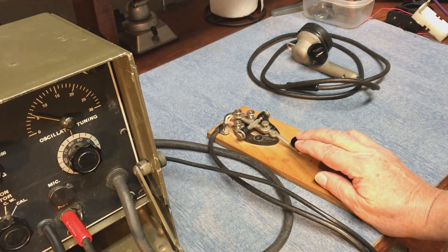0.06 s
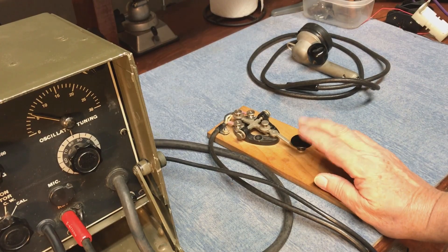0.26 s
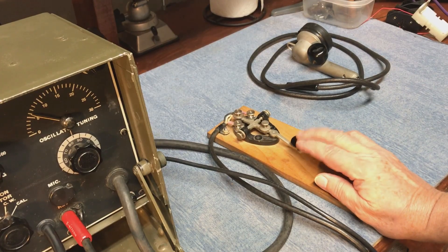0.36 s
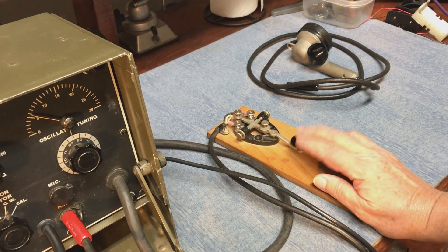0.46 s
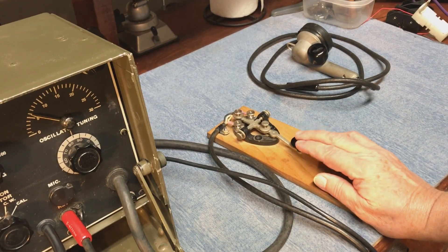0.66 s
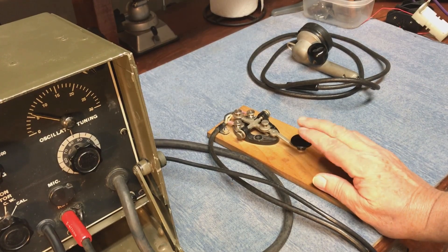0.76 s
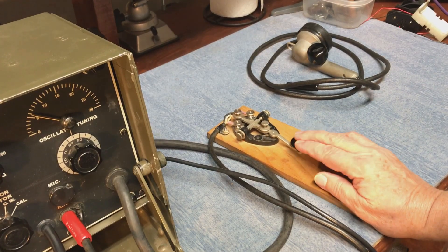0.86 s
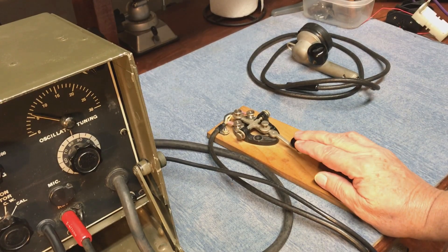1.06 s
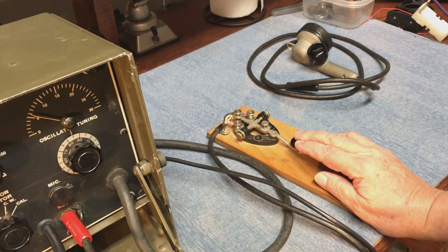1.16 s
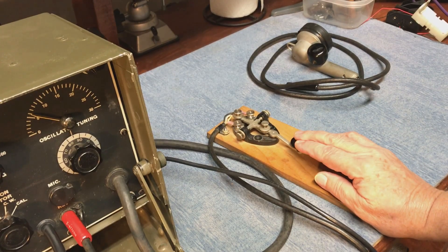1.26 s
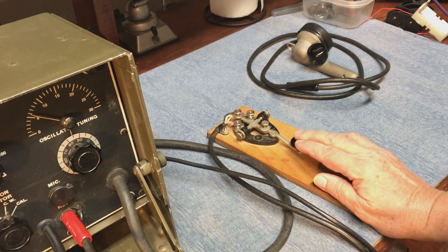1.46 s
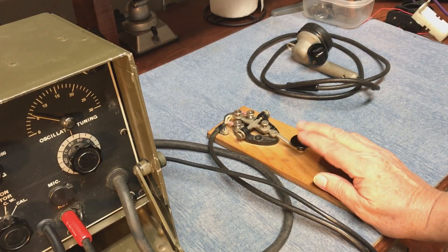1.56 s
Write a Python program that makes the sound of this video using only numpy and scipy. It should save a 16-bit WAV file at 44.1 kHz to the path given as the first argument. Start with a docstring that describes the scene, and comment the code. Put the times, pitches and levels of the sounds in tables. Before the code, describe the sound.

Close by in a small room, a metal telegraph key on a wooden base clatters up and snaps down four times within a second. Its spring pings faintly, then only a soft electrical hum and hiss remain.

```python
"""In a small room, a telegraph key on a wooden base is pressed four times on a cloth-covered table.
Going down, the lever snaps onto its contact; let go, it clatters against the back stop and its spring
pings faintly. Each impact excites the damped modes of the metal, the base and the table top.
Mains equipment hums and whines steadily behind, with a soft hiss and very faint electrical ticks."""
import sys
import numpy as np
from scipy import signal
from scipy.fft import rfft, irfft, next_fast_len
from scipy.io import wavfile
from scipy.ndimage import uniform_filter1d, map_coordinates

SR = 44100
rng = np.random.default_rng(int(sys.argv[2]) if len(sys.argv) > 2 else 0)


def store_wav(level_fs):
    """Save 16-bit WAV to argv[1]."""
    pcm = np.round(np.clip(np.atleast_2d(level_fs), -1, 1) * 32767)
    wavfile.write(sys.argv[1], SR, pcm.T.astype(np.int16))


N = 70560
ATTACK_S = .0001

# Impacts on the contact and the back stop. Each row: start in seconds, level in dB, table thump in dB.
PRESSES = [(.3120, 0.5, -35.5), (0.4697, -6, -42), (0.6152, -2.5, -42), (0.822, 2, -36)]
RETURNS = [(0.1998, 1.5, -45.5), (0.2136, 1, -37), (0.2239, -13, -64.5), (0.3878, -1.5, -41),
           (0.3985, -3.5, -41), (.4065, -11.5, -51), (0.5269, 0, -47.5), (0.5404, -3, -39.5),
           (0.55, -11.5, -45.5), (.6881, 2, -42), (0.7016, -1, -37)]
# Noise spectrum of the spring and the pivot. Each row: frequency in Hz, level in dB.
SPRING_SPECTRUM = [(1500, -30.5), (3350, -7.5), (4300, -8.5), (5480, 2.5), (6400, -9.5), (7500, -17),
                   (11000, -22.5), (13000, -31.5)]


def amp(db):
    """Amplitude grows tenfold every 20 dB."""
    return 10 ** (np.asarray(db) / 20)


def along(points, hz):
    """Interpolation of (Hz, value) points on a logarithmic frequency axis."""
    f, v = np.transpose(points)
    return np.interp(np.log(hz + 1), np.log(f + 1), v)


def filtered(x, response):
    """Linear filtering multiplies the spectrum by a frequency response."""
    m = next_fast_len(len(x) + SR // 2)
    return irfft(rfft(x, m) * response(np.fft.rfftfreq(m, 1 / SR)), m)[:len(x)]


def coloured(x, spectrum):
    """A minimum-phase filter evens a short sound out to a given spectrum, with unit energy."""
    m = next_fast_len(2 * len(x), real=True) * 2
    z = rfft(x, m)
    power = np.abs(uniform_filter1d(np.abs(z) ** 2, size=int(250 * m / SR)))  # averaged over 250 Hz
    gain = amp(along(spectrum, np.fft.rfftfreq(m, 1 / SR))) / np.sqrt(power + 1e-12)
    cepstrum = irfft(np.log(gain), m)
    causal_response = np.exp(rfft(2 * cepstrum[:m // 2], m))
    y = irfft(z * causal_response, m)[:len(x)]
    return y / np.linalg.norm(y)


def noise(spectrum):
    """Filtering colours white noise; the rms is 1."""
    x = filtered(rng.standard_normal(N), lambda hz: amp(along(spectrum, hz)))
    return x / x.std()


def wobble(rate):
    """Slow random modulation: a spline through rate knots a second."""
    knots = rng.standard_normal(int(N * rate / SR) + 4)
    return map_coordinates(knots, [np.arange(N) * rate / SR])


def fade(t, t60):
    """Exponential damping: 60 dB in t60 seconds."""
    return np.exp(-np.log(1000) * t / t60)


def at(s, x):
    """A pure delay of s seconds, in a signal of scene length."""
    return np.pad(x, (round(s * SR), N))[:N]


def ring(modes, rise_s=ATTACK_S):
    """Modal superposition: a struck body sounds as damped sines, here of alternating sign."""
    t = np.arange(SR // 3) / SR
    tone = sum((-1) ** k * amp(db) * fade(t, t60) * np.sin(2 * np.pi * hz * t)
               for k, (hz, db, t60) in enumerate(modes))
    return tone * (1 - np.exp(-t / rise_s))


def burst(spectrum, db, t60):
    """Modal overlap: modes too dense to tell apart merge into decaying noise."""
    t = np.arange(SR // 3) / SR
    envelope = fade(t, t60) * (1 - np.exp(-t / ATTACK_S))
    return amp(db) * np.linalg.norm(envelope) * coloured(envelope * rng.standard_normal(len(t)), spectrum)


def lever(blows, metal, base_spectrum, base_db):
    """Impact excitation: the metal rings alike at each blow, over a fresh burst from the wooden base."""
    return sum(at(s, amp(db) * in_room(metal + burst(base_spectrum, base_db, t60=.051)))
               for s, db, _ in blows)


def contact():
    """The lever snaps onto its contact: a brief impact excites a broad band of modes."""
    # Modes of the key. Each row: frequency in Hz, level in dB, T60 in seconds.
    modes = [(640, -18, 0.076), (1184, -15, 0.056), (2583, -5, 0.038), (2799, -5, 0.036), (3423, 2, 0.033),
             (3736, -3, 0.031), (4021, -4, 0.03), (4468, -4, 0.029), (5060, -2, 0.027), (5399, 0, 0.026),
             (5695, 0, 0.025), (6400, -1, 0.024), (7789, -1, 0.022), (8155, -2, 0.021), (9162, -3, 0.02),
             (11191, -5, 0.018)]
    # Spectra of the crack and the base. Each row: frequency in Hz, level in dB.
    crack_spectrum = [(200, -36), (600, -22), (1200, 0.5), (2200, -11.5), (3300, 4.5), (4200, -10),
                      (5600, 0.5), (6400, 3), (7050, -7.5), (7800, 4.5), (9200, -3), (10000, -12.5),
                      (11000, -5), (12300, -14), (13700, -2), (15000, -14.5)]
    base_spectrum = [(150, -8), (400, -2), (1200, -13), (2200, 5.5), (3000, 2.5), (5500, 3.5), (9000, -5),
                     (15000, -18)]
    metal = amp(-25.5) * ring(modes) + burst(crack_spectrum, db=-12.5, t60=.0081)
    return lever(PRESSES, metal, base_spectrum, base_db=-27.5)


def back_stop():
    """The lever rebounds on its back stop: the point of impact decides which modes ring."""
    # Modes of the key. Each row: frequency in Hz, level in dB, T60 in seconds.
    modes = [(882, -9, 0.065), (1512, -8, 0.049), (1964, -10, 0.043), (2492, -6, 0.038), (2691, -5, 0.037),
             (2847, -4, 0.036), (3063, -5, 0.035), (3423, 0, 0.033), (3725, 1, 0.031), (4570, 1, 0.028),
             (5216, -4, 0.027), (6314, -3, 0.024), (9027, -11, 0.02), (9797, -7, 0.019)]
    # Spectra of the crack and the base. Each row: frequency in Hz, level in dB.
    crack_spectrum = [(300, -19), (1200, -25), (2500, 0), (3800, 6), (5200, -1), (6400, -2), (7300, -10.5),
                      (9800, -5.5), (10800, -25), (14000, -19), (16000, -29.5)]
    base_spectrum = [(150, 0.5), (500, -9.5), (900, 3), (1300, -8), (3000, 3.5), (5500, -2.5),
                     (9500, -14.5), (15000, -20)]
    metal = amp(-33) * ring(modes) + burst(crack_spectrum, db=-25, t60=.01)
    return lever(RETURNS, metal, base_spectrum, base_db=-35.5)


def spring():
    """Free vibration of the settling spring: a high ping with a tick and a buzzing tail."""
    # Pings. Each row: start in seconds, level in dB.
    pings = [(0.4154, -1.5), (.5745, -7), (0.7175, 0), (0.9256, 0.5)]
    # Modes of the spring. Each row: frequency in Hz, level in dB, T60 in seconds.
    modes = [(3360, -17, 0.042), (5430, -4, 0.038), (5540, -15.5, 0.026), (6390, -16, 0.036),
             (9130, -18, 0.02), (11050, -15.5, 0.015)]
    tone = amp(-37) * ring(modes)
    sound = np.zeros(N)
    for s, db in pings:
        tick = burst(SPRING_SPECTRUM, db=-51.5, t60=.035)
        buzz = burst(SPRING_SPECTRUM, db=-55.5, t60=.25)
        sound += at(s, amp(db) * in_room(tone + tick + buzz))
    return sound


def table_top():
    """Structure-borne sound: each blow passes into the table and excites its low modes."""
    # Modes of the table top. Each row: frequency in Hz, level in dB, T60 in seconds.
    modes = [(112.4, 1.5, 0.14), (84, -4.5, 0.088), (238.6, -6.5, 0.13)]
    thump = ring(modes, rise_s=.0064)
    return sum(at(s + .0011, amp(db) * thump) for s, _, db in PRESSES + RETURNS)


def pivot():
    """Friction at the pivot makes a faint rub, starting 12 ms before the lever lands."""
    return sum(at(s - .012, amp(db) * burst(SPRING_SPECTRUM, db=-57.5, t60=.12)) for s, db, _ in PRESSES)


def in_room(x):
    """Reverberation: a diffuse tail follows the direct sound, each frequency dying at its own rate."""
    # Decay of the room. Each row: frequency in Hz, T60 in seconds.
    decay_times = [(200, 0.13), (1000, 0.19), (3000, 0.16), (6000, .19), (14000, 0.14)]
    # Spectrum of the tail. Each row: frequency in Hz, level in dB.
    spectrum = [(100, 6), (700, 15), (1500, 8), (2700, 9.5), (3500, 0), (6000, -2.5), (9000, -2.5),
                (14000, 1.5)]
    hz, t, bands = signal.stft(rng.standard_normal(SR // 3), SR, nperseg=256)
    tail = signal.istft(bands * fade(t, along(decay_times, hz)[:, None]), SR, nperseg=256)[1]
    build_up = 1 - np.exp(-np.arange(len(tail)) / SR / .0018)
    tail = coloured(tail * build_up, spectrum)
    return at(0, x) + amp(-15) * at(.004, signal.fftconvolve(x, tail))


def mains_hum():
    """A line spectrum of hum and fan-like whine, slightly modulated in amplitude and phase."""
    # Partials. Each row: frequency in Hz, rms level in dB.
    partials = [(59.8, -67.5), (119.8, -64), (240, -73), (511, -74.5), (703.3, -62.5), (1406.6, -70.5)]
    waver_db, waver_rad = 1.5, .12
    t = np.arange(N) / SR
    hum = np.zeros(N)
    for hz, db in partials:
        peak = np.sqrt(2) * amp(db + waver_db * wobble(8))
        phase = 2 * np.pi * (hz * t + rng.random()) + waver_rad * wobble(8)
        hum += peak * np.sin(phase)
    return hum


def room_air():
    """Stationary broadband noise: the low rush of the room's air and a soft hiss."""
    # Noise spectra. Each row: frequency in Hz, relative spectral density in dB.
    air_spectrum = [(15, -29.5), (25, -11.5), (59, -3), (90, -11), (123, -3.5), (429, -14.5), (470, -9),
                    (564, -13.5), (691, -14), (757, -21.5), (926, -8), (1260, -23.5), (1360, -17),
                    (2000, -27), (2600, -41.5), (4400, -120)]
    hiss_spectrum = [(1200, -50), (2000, -2), (2500, -4.5), (3200, -7), (4800, -9.5), (6000, -7),
                     (8000, -12.5), (10000, -17), (15500, -17)]
    return amp(-59.5) * noise(air_spectrum) + amp(-70) * noise(hiss_spectrum)


def interference():
    """Periodic electrical interference, too slow to fuse into a pitch, is heard as faint high ticks."""
    # Spectrum of a tick. Each row: frequency in Hz, level in dB.
    spectrum = [(6000, -25), (10000, 3.5), (13000, 12.5), (16000, -9.5)]
    first_s, period_s = .0952, .1024
    return sum(at(s, burst(spectrum, db=-62, t60=.004)) for s in np.arange(first_s, N / SR, period_s))


def scene():
    """Superposition: the key, the table and the background add in one channel."""
    key = contact() + back_stop() + spring() + table_top() + pivot()
    return (key + mains_hum() + room_air() + interference())[None]


def record(dry):
    """Band limiting: a steep low-pass filter removes the highest treble."""
    cutoff_hz = 15950
    return filtered(dry[0], lambda hz: 1 / (1 + (hz / cutoff_hz) ** 120))[None]


dry = scene()
out = record(dry)
store_wav(out)
```